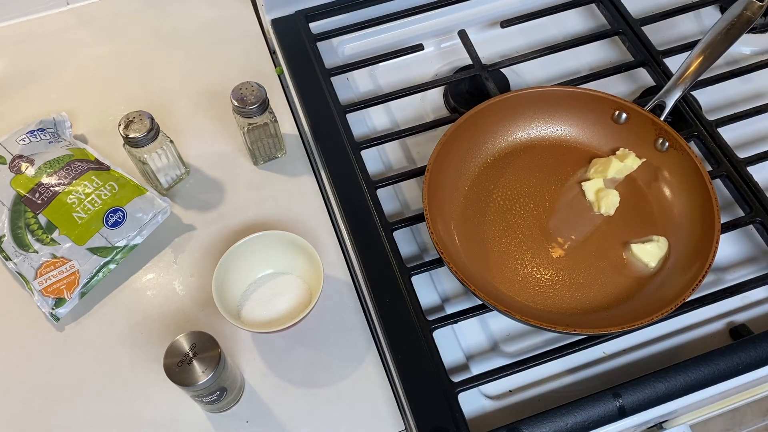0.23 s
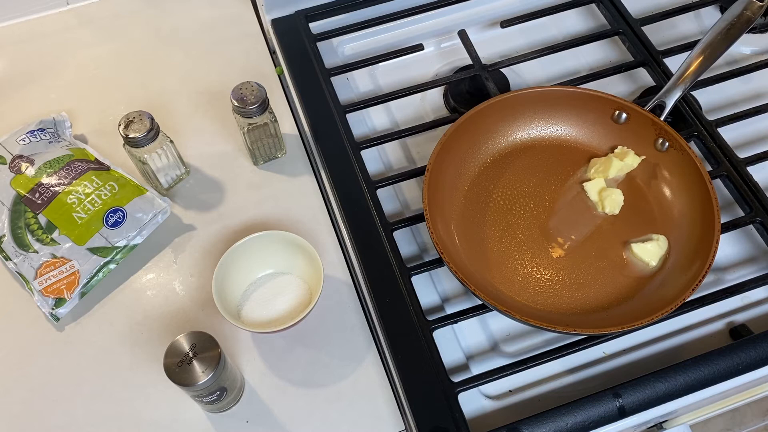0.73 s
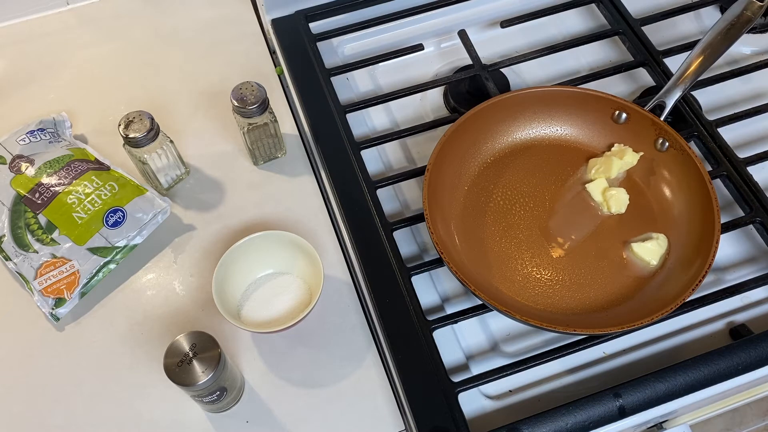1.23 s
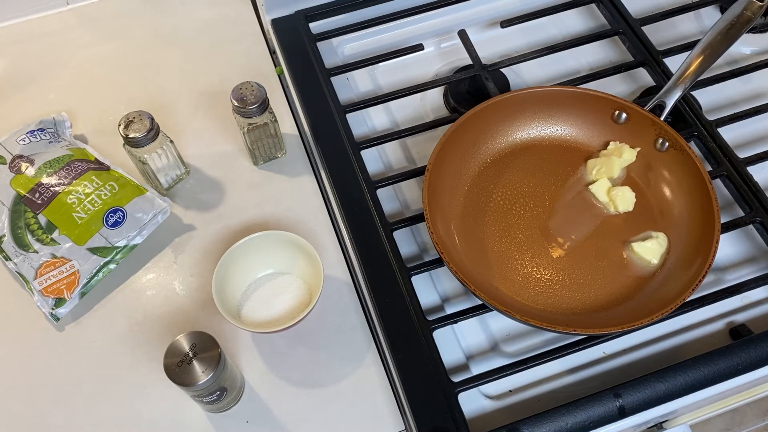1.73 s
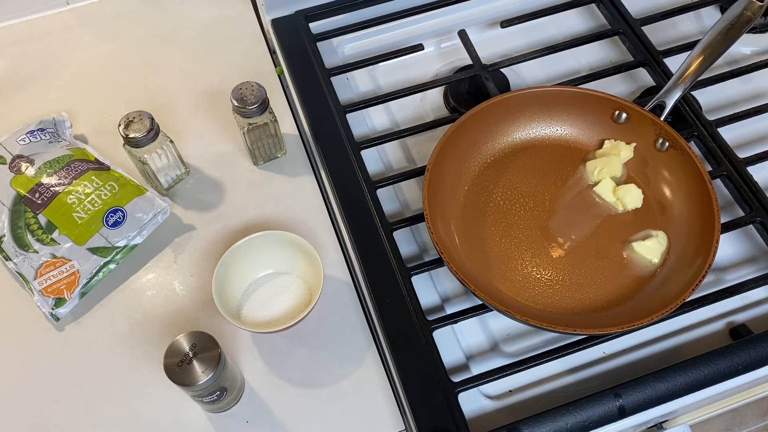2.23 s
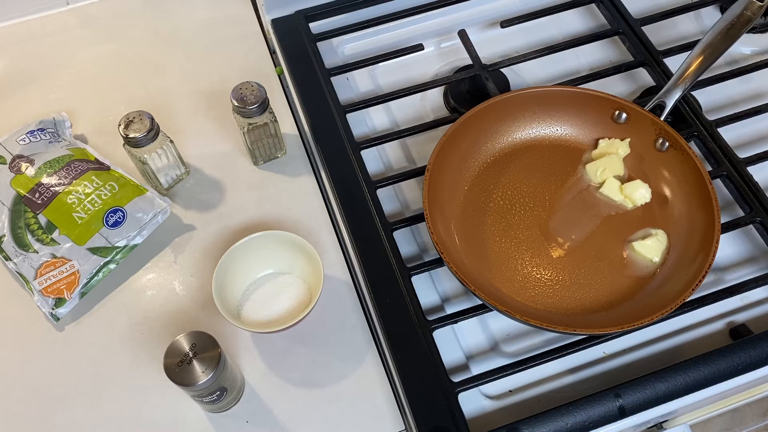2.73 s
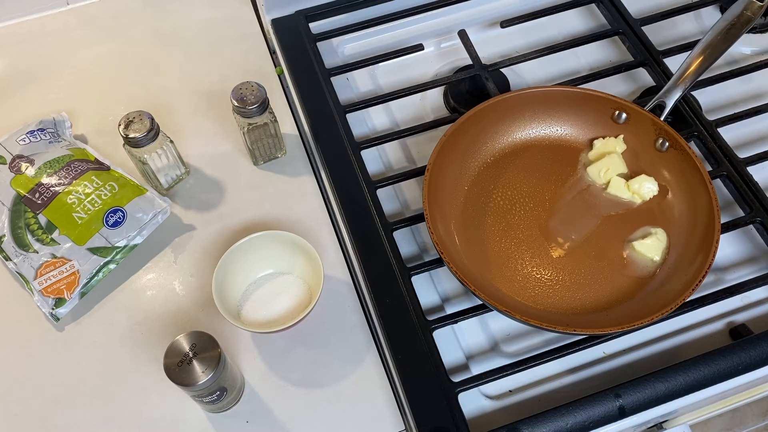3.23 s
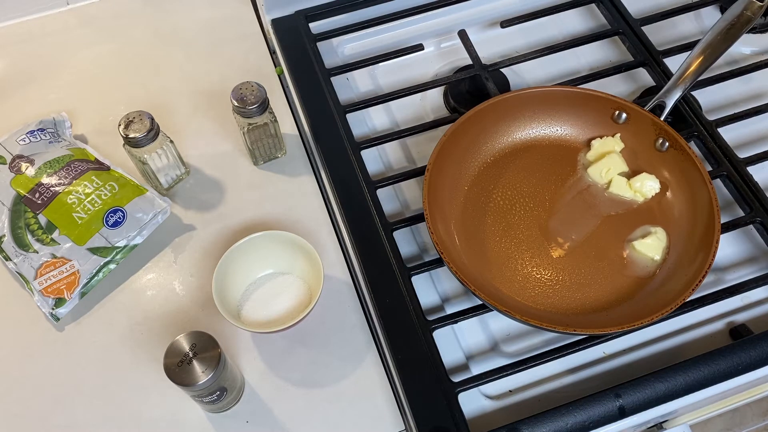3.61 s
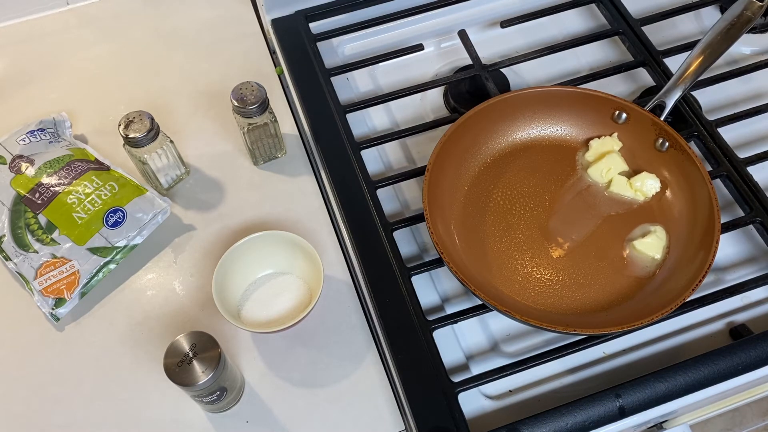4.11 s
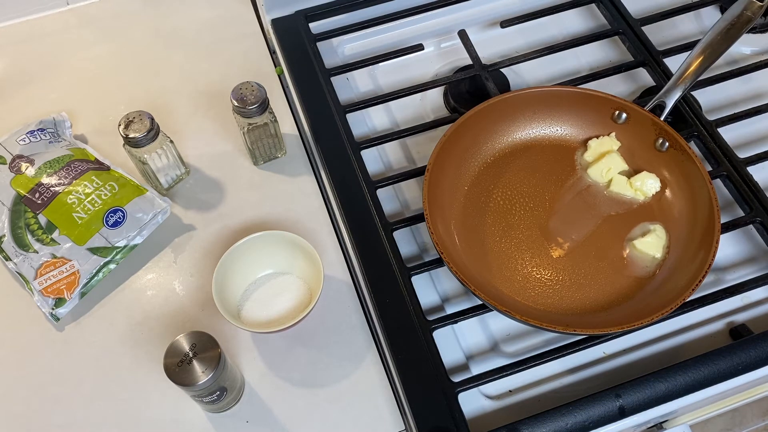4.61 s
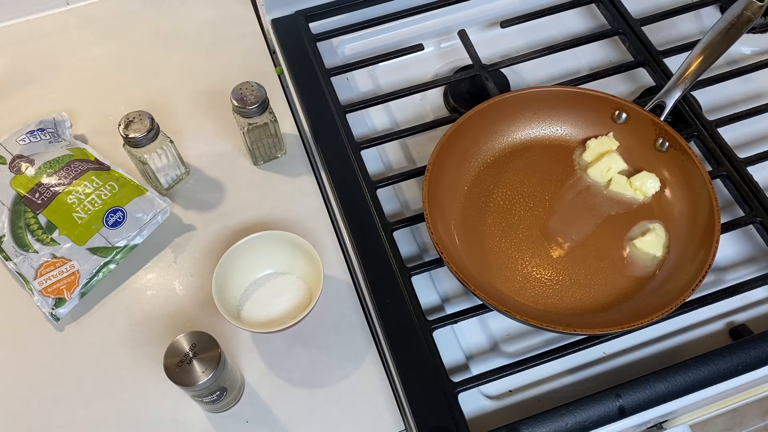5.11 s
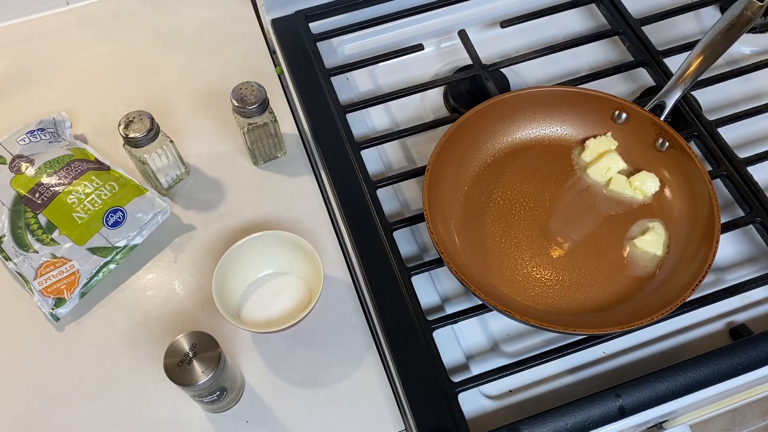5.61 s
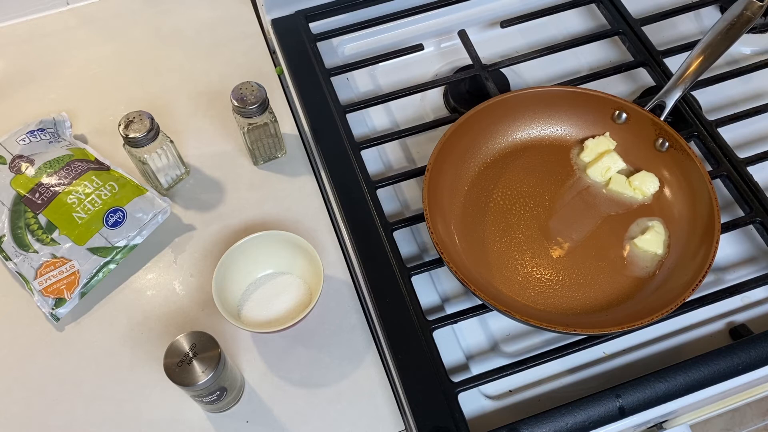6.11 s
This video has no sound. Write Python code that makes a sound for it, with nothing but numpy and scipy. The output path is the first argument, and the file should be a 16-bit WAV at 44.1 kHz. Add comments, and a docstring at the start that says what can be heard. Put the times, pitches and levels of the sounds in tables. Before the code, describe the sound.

Soft clothing rustle and scuffs, a cupboard pulled open with clattering knocks, light handling, one loud wooden slam, then quiet movement over appliance hum.

```python
"""A hard-walled kitchen: a wooden cupboard door, a few steps away, is pulled open, handled and knocked shut.
Each blow is a crack of noise plus decaying door modes, with echoes from the walls; small things tap on the
shelves; pushes and the slam thud, as clusters of modes. Cloth, soles, a sliding thing and the rumbling cabinet
are shaped noise, over air hiss and humming appliances. Two microphone ports, the left a little farther away."""
import sys
import numpy as np
from scipy import signal
from scipy.fft import rfft, irfft, next_fast_len
from scipy.io import wavfile
from scipy.ndimage import uniform_filter1d, minimum_filter1d, map_coordinates

SR = 44100
rng = np.random.default_rng(int(sys.argv[2]) if len(sys.argv) > 2 else 0)


def transcribe(signal):
    """Save signal, clipped to [-1, 1], as a 16-bit WAV file at the path in sys.argv[1]."""
    frames = np.atleast_2d(signal).T
    limited = np.clip(frames, -1, 1)
    pcm = np.round(limited * 32767).astype(np.int16)
    wavfile.write(sys.argv[1], SR, pcm)


N = 280071

# blows on the door: (time [s], crack level [dB], panel level [dB], boom level [dB], brightness [dB per octave])
BLOWS = [(1.049, -39, -31, -27, -4), (1.8891, -26, -36, -21, -1), (1.905, -25.5, -33, -30, -0.5),
         (1.9441, -28, -43, -31, -0.5), (1.9734, -23, -24.5, -25, -0.5), (1.9957, -19.5, -22.5, -26, 5.5),
         (2.0274, -16.5, -28, -23, -2), (2.141, -18.5, -23, -32, -1.5), (2.161, -47, -31, -32, 1),
         (2.3445, -33.5, -56, -35, -1.5), (2.4774, -32.5, -52, -39, -3.5), (2.596, -33.5, -50, -38, -2),
         (2.7001, -35.5, -47, -52, -4.5), (2.925, -54, -40, -39, -13), (3.4533, -31.5, -35, -33, -4),
         (3.607, -41, -31, -40, -5), (3.6219, -27.5, -38, -34, 0), (3.6442, -28.5, -31, -28, 1),
         (3.6984, -36, -35.5, -37, -4), (3.8245, -31, -27.5, -28, 0), (4.0927, -38, -47, -37, -3),
         (4.1365, -33.5, -31.5, -30, -5), (4.2065, -40, -46, -31, 5), (4.348, -19, -28, -13, -2),
         (4.3554, -9, -4.5, -4, -3), (4.365, -9.5, -18, -6.5, -6), (4.3795, -29, -20, -12, 6.5),
         (4.3998, -39, -34, -9, 11.5)]


def amp(db):
    """Amplitude factor of a level in dB."""
    return np.exp(np.asarray(db) * np.log(10) / 20)


def unit(x):
    """x scaled to rms 1."""
    return x / np.sqrt(np.mean(x ** 2) + 1e-20)


def along(points, hz):
    """Value at hz between (frequency, value) points on a log axis."""
    f, v = np.transpose(points)
    return np.interp(np.log(hz + 1), np.log(f + 1), v)


def levels(tables):
    """Per-sample dB curves of the tables' columns; the first column is silent between tables."""
    rows = []
    for table in tables:
        first, last = table[0], table[-1]
        rows += [(first[0] - .03, -100, *first[2:]), *table, (last[0] + .03, -100, *last[2:])]
    s, *columns = np.transpose(rows)
    return [np.interp(np.arange(N) / SR, s, column) for column in columns]


def wobble(rate):
    """A smooth random curve, rate knots a second."""
    knots = rng.standard_normal(int(N * rate / SR) + 4)
    return map_coordinates(knots, [np.arange(N) * rate / SR])


def filtered(x, response):
    """x passed through a complex response of frequency."""
    m = next_fast_len(N + SR // 2)
    hz = np.fft.rfftfreq(m, 1 / SR)
    return irfft(rfft(x, m) * response(hz), m)[..., :N]


def resonances(modes):
    """Response of a body with (frequency [Hz], width [Hz], level [dB]) modes of alternating sign."""
    def response(f):
        return sum((-1) ** k * amp(db) * 1j * f * width / (hz * hz - f * f + 1j * f * width)
                   for k, (hz, width, db) in enumerate(modes))
    return response


def steep(modes):
    """The modes' response applied twice: little is heard away from them."""
    return lambda hz: resonances(modes)(hz) ** 2


def ports(pair):
    """Blends a pair: the ports agree in bass and at the very top, differ between; the left hears later."""
    # left-right likeness: (frequency [Hz], correlation [0-1])
    likeness = [(60, 0.99), (130, 0.97), (290, 0.83), (640, 0.087), (1400, 0.068), (3100, 0.04),
                (7000, 0.77), (15000, 1)]
    left_lag_s = 12 / 44100

    def shares(hz):
        turn = np.arccos(np.clip(along(likeness, hz), -1, 1)) / 2
        return np.array([np.cos(turn), np.sin(turn)])
    mid, side = filtered(pair, shares)
    left_right = np.array([mid + side, mid - side])
    # half the lag delays the left port, half advances the right
    return filtered(left_right, lambda hz: np.exp(np.pi * 1j * left_lag_s * np.outer([-1, 1], hz)))


def noise(response, lumpy_db=0, rate=100, patchy_db=0):
    """Diffuse stereo noise of rms 1, in lumps of random size and patches of random colour."""
    lumpy = amp(lumpy_db * wobble(rate)) * rng.standard_normal((2, N))
    z = signal.stft(lumpy, nperseg=256)[2]
    field = uniform_filter1d(rng.standard_normal(z.shape[1:]), size=5, axis=0)
    field = uniform_filter1d(field, size=12, axis=1)
    pair = signal.istft(z * amp(patchy_db * unit(field)), nperseg=256)[1][:, :N]
    return unit(ports(filtered(pair, response)))


def rubs(start_s, hold_s, level_db):
    """Summed gain of rubs: each rises up to its start, holds, then dies away."""
    rise_db_per_s, fall_db_per_s = 700, 164
    coarse = np.arange(0, N, 32)
    start, hold, level = (np.reshape(v, (-1, 1)) for v in (start_s, hold_s, level_db))
    t = coarse / SR - start
    shape_db = rise_db_per_s * np.minimum(t, 0) - fall_db_per_s * np.maximum(t - hold, 0)
    power = (amp(level + shape_db) ** 2).sum(0)
    return np.interp(np.arange(N), coarse, np.sqrt(power))


def tail(colour):
    """A fresh pair of echo trains of energy 1 before the colour; each frequency dies at its own speed."""
    # how long the kitchen rings: (frequency [Hz], 60 dB decay time [s])
    kitchen_t60 = [(60, 0.27), (200, 0.54), (600, 0.43), (2000, 0.61), (5000, 0.53), (12000, 0.39)]
    size = SR * 3 // 4
    hz, t, z = signal.stft(rng.standard_normal((2, size)), SR, nperseg=256)
    fade = amp(-60 * t / along(kitchen_t60, hz)[:, None])
    norm = np.sqrt(np.mean(fade ** 2, axis=1, keepdims=True) * size)
    echoes = signal.istft(z * fade / norm * colour(hz)[:, None], SR, nperseg=256)[1]
    return echoes * (1 - np.exp(-np.arange(echoes.shape[1]) / SR / 0.0012))  # soft onset


def struck(events, count, spread, cycles):
    """A dull cluster of close modes around each pitch, wider for high ones, building up over some cycles."""
    out, t = np.zeros(N + SR), np.arange(SR // 4) / SR
    for s, db, hz, t60 in events:
        width = spread * (hz / 700) ** .8
        modes = hz * np.exp(rng.normal(0, width, (count, 1)))
        shape = amp(db - 60 * t / t60) * (1 - np.exp(-t * hz / cycles))
        out[round(s * SR):][:len(t)] += shape * np.sin(2 * np.pi * modes * t).sum(0) / np.sqrt(count)
    return out[:N]


def air():
    """Room air: steady hiss and low rumble, slightly uneven in level and colour."""
    # spectrum shape: (frequency [Hz], level [dB per Hz])
    air_colour = [(13, -59), (25, -31), (42, -1.5), (70, -0.5), (165, -8.5), (205, -2.5), (340, -10),
                  (510, -16), (900, -18), (1250, -26.5), (2500, -31.5), (4500, -32.5), (7500, -39.5),
                  (11000, -40.5), (16000, -46)]
    return amp(-41.5) * noise(lambda hz: amp(along(air_colour, hz)), lumpy_db=1.0, rate=6, patchy_db=0.53)


def hum():
    """Appliances: noise through narrow resonances gives wavering bands of hum."""
    # bands: (frequency [Hz], width [Hz], level [dB])
    hum_bands = [(60.3, 3.3, -52), (81.3, 5.7, -48.5), (122.6, 1.04, -50.5), (209.2, 5.8, -52),
                 (242.1, 3.2, -53.5), (295, 38, -54.5), (354.3, 4.4, -57.5), (2074, 40, -63.5),
                 (6250, 120, -63)]
    return sum(amp(db) * noise(resonances([(hz, width, 0)])) for hz, width, db in hum_bands)


def rustle():
    """Cloth rubbing: dense lumpy friction noise, each stroke with more or less fine sheen."""
    # strokes: (start [s], hold [s], level [dB], sheen over it [dB])
    strokes = [(0.0, 0.025, -44.5, -0.5), (0.195, 0.13, -53.5, 1), (0.28, 0.12, -52, 2.5),
               (0.432, .06, -54, 2.5), (0.516, .08, -49.5, 3.5), (0.635, 0.13, -52, 2),
               (0.784, 0.12, -49.5, 5.5), (0.865, 0.13, -46.5, 1.5), (1.038, 0.064, -50.5, -8),
               (1.14, 0.037, -47.5, 2.5), (1.23, .05, -49.5, -2), (1.38, .02, -58.5, 7.5),
               (1.426, 0.073, -55.5, -1), (1.645, .01, -53, -11), (1.741, 0.2, -52.5, -18),
               (2.294, 0.16, -51, -14), (2.549, 0.023, -46, -8), (3.188, .22, -59.5, -2),
               (3.448, 0.01, -48, -18), (3.513, 0.087, -53, -20), (3.638, 0.017, -38, -30),
               (3.723, 0.094, -47, -24), (3.808, 0.033, -43, -20), (3.897, 0.11, -53.5, -10),
               (4.107, 0.028, -50, -24), (4.194, 0.18, -54, -3), (4.666, 0.13, -61.5, 0.5),
               (5.201, 0.06, -50.5, -10), (5.331, .02, -50.5, -15), (5.358, .06, -47, -7.5),
               (5.435, 0.07, -50.5, -8), (5.798, .1, -53, -2.5), (5.91, 0.064, -49, -15),
               (6.04, 0.098, -60, -20)]
    # spectrum shapes of cloth and sheen: (frequency [Hz], level [dB per Hz])
    cloth_colour = [(300, -7), (600, -15.5), (1100, -5), (2000, 1), (3500, -1.5), (5500, -7), (8000, -14.5),
                    (12000, -100)]
    sheen_colour = [(3500, -8.5), (6000, 3.5), (8000, -9.5), (11000, -5.5), (16000, -13)]
    start_s, hold_s, level_db, sheen_db = np.transpose(strokes)
    cloth = noise(lambda hz: amp(along(cloth_colour, hz)), lumpy_db=0.5, rate=140, patchy_db=1.5)
    sheen = noise(lambda hz: amp(along(sheen_colour, hz)), lumpy_db=0.5, rate=240, patchy_db=1.5)
    return rubs(start_s, hold_s, level_db) * cloth + rubs(start_s, hold_s, level_db + sheen_db) * sheen


def soles():
    """Soles scuffing: lumpy friction noise through two steep resonances."""
    # scuffs: (start [s], hold [s], level [dB])
    scuffs = [(0.14, 0.039, -54), (0.29, 0.33, -57.5), (0.9, .03, -60), (1.048, .1, -53.5),
              (1.66, 0.035, -50), (1.82, .03, -53.5), (2.408, 0.054, -50.5), (2.91, 0.025, -62),
              (3.2, 0.27, -56), (3.455, 0.11, -48), (3.64, .03, -48), (3.88, 0.073, -45.5),
              (4.127, 0.044, -52), (4.69, 0.093, -56), (5.402, 0.17, -56), (5.904, 0.043, -45),
              (6.05, .04, -56)]
    # resonances: (frequency [Hz], width [Hz], level [dB])
    scuff_modes = [(748, 360, 5.5), (1343, 220, 2.5)]
    return rubs(*np.transpose(scuffs)) * noise(steep(scuff_modes), lumpy_db=-2.5, rate=97)


def cracks():
    """The crack of each blow, ragged as loose parts rattle, then its echoes from the walls."""
    # spectrum shape of a crack: (frequency [Hz], level [dB per Hz])
    crack_colour = [(150, -28), (400, 2.5), (900, -3), (1400, -2), (2200, 0), (3500, -5), (5500, -7.5),
                    (7800, -24), (11000, -30), (16000, -46)]
    sheen_db = 4.5  # reached at 5.5 kHz
    crack_t60_s = 0.082
    snap_t60_s, snap_db = 0.0099, -0.5  # the first sharp contact, relative to the crack
    out, size = np.zeros((2, N + SR)), SR // 4
    t = np.arange(size) / SR
    decay = amp(-60 * t / crack_t60_s) + amp(snap_db - 60 * t / snap_t60_s)
    shape = decay * (1 - np.exp(-t / 0.00041))
    rattle = amp(1.73 * wobble(260))
    for s, crack_db, _, _, bright_db in BLOWS:
        def colour(hz):
            sheen = sheen_db * np.interp(hz, [4300, 5500], [0, 1])
            tilt = bright_db * np.log2(hz / 2500 + 0.054)
            return amp(crack_db + sheen + along(crack_colour, hz) + tilt)
        start = round(s * SR)
        hz, _, z = signal.stft(rng.standard_normal((2, size)), SR, nperseg=256)
        burst = signal.istft(z * colour(hz)[:, None], SR, nperseg=256)[1][:, :size]
        burst *= shape * amp([[0], [-6]])  # less of what differs between the ports
        echoes = amp(28.0) * tail(colour)
        out[:, start:][:, :size] += burst * rattle[start:][:size]
        out[:, start:][:, :echoes.shape[1]] += echoes
    return ports(out[:, :N])


def ringing():
    """Each blow rings the panels and, slower to build, the low cabinet modes; the pair differs in phase."""
    # modes of door and cabinet: (frequency [Hz], level [dB], 60 dB decay time [s])
    door_modes = [(65.3, -8, 0.37), (74.3, -10.5, 0.37), (89, -11, 0.22), (125, -6, 0.23), (183, -4, 0.18),
                  (232.8, -1.5, 0.13), (285, -9, 0.14), (320, -5.5, 0.12), (388, -8, 0.14),
                  (419.6, -11, 0.14), (465, -13.5, 0.15), (505, -4, 0.098), (546, -19, 0.094),
                  (580.3, -12.5, 0.21), (630, -10, 0.093), (681, -18, 0.13), (742, -12.5, 0.11),
                  (845, -13, 0.21), (905, -22.5, 0.19), (1037, -16, 0.17), (1173, -18.5, 0.15),
                  (1615, -18.5, 0.14), (2020, -24, .1), (2630, -22.5, 0.15)]
    out, t = np.zeros((2, N + SR)), np.arange(SR // 3) / SR
    for s, _, panel_db, boom_db, _ in BLOWS:
        for hz, db, t60 in door_modes:
            # boom drives the modes below 150 Hz, panel those above 300 Hz
            force_db = np.interp(np.log(hz), np.log([150, 300]), [boom_db, panel_db])
            level_db = force_db + db + rng.normal(0, 2.64)
            rise = (1 - np.exp(-t * hz / 1.4)) ** 2
            offset = np.array([[0], [rng.uniform(0, 2 * np.pi)]])
            phase = 2 * np.pi * hz * rng.normal(1, 0.0085) * t + offset
            out[:, round(s * SR):][:, :len(t)] += amp(level_db - 60 * t / t60) * rise * np.sin(phase)
    return out[:, :N]


def kitchen(x):
    """The walls return the ringing as a diffuse tail, least in the bass."""
    # share of the ringing that returns: (frequency [Hz], level [dB])
    returned = [(60, -29), (200, -1.5), (500, -1)]
    wet = signal.fftconvolve(x[None], tail(np.ones_like), axes=1)[:, :N]
    return ports(filtered(wet, lambda hz: amp(along(returned, hz))))


def taps():
    """Small objects set down or nudged: hard contacts, clusters of modes that build in milliseconds."""
    # taps: (time [s], level [dB], pitch [Hz], 60 dB decay time [s])
    tap_events = [(1.089, -41.5, 1098, 0.24), (1.89, -28.5, 3650, .04), (2.026, -21, 2500, 0.041),
                  (2.03, -27.5, 1044, 0.062), (2.143, -24.5, 694, 0.059), (2.479, -38, 1510, .05),
                  (2.597, -33.5, 3530, 0.057), (2.698, -33.5, 870, 0.042), (2.7, -34.5, 1115, .05),
                  (2.925, -37, 860, .045), (2.93, -33, 373, .09), (3.455, -33, 2050, 0.04),
                  (3.645, -28, 2360, .055), (3.645, -33, 1316, 0.055), (3.825, -34, 4100, 0.037),
                  (4.15, -39, 806, 0.072), (4.15, -35, 1274, .07), (4.206, -34.5, 3490, .025),
                  (5.345, -36, 2210, 0.05), (5.914, -39, 1010, .04), (5.93, -35, 1565, 0.11),
                  (6.022, -33, 790, 0.041), (6.045, -38, 790, 0.1)]
    return struck(tap_events, count=14, spread=0.03, cycles=3.1)


def rumble():
    """The swinging door and the hands on it shake the cabinet and its panels."""
    # the door swings open, later shut: (time [s], cabinet level [dB], panels over it [dB])
    swings = [
        [(1.62, -49, -2), (1.84, -39.5, -8), (1.92, -35, -2), (2.004, -29.5, -9), (2.118, -33.5, 0),
         (2.164, -33, -14), (2.36, -40, 0), (2.55, -43, -6.5), (2.8, -48, -15)],
        [(3.2, -58, 5), (3.394, -34, -12.5), (3.476, -50, -9), (3.578, -31, -2.5), (3.62, -40, 1.5),
         (3.81, -33, -12), (3.85, -42, 0), (3.918, -27, -8.5), (3.96, -31, -12), (4.1, -40, -5.5),
         (4.33, -41.5, -11)],
    ]
    # resonances of cabinet and panels: (frequency [Hz], width [Hz], level [dB])
    cabinet_modes = [(68, 35.5, 0), (151.3, 66, -1.5)]
    panel_modes = [(214, 117, -1.5), (381, 135, 1.5), (600, 334, -3.5)]
    level_db, panel_db = levels(swings)
    cabinet = noise(steep(cabinet_modes))
    panels = noise(steep(panel_modes), lumpy_db=2.0, rate=37)
    return amp(level_db) * (cabinet + amp(panel_db) * panels)


def thuds():
    """Pushes and the slam flex the cabinet: pairs of low modes that swell over about one cycle."""
    # thuds: (time [s], level [dB], pitch [Hz], 60 dB decay time [s])
    thud_events = [(1.905, -23.5, 134, 0.19), (1.975, -10.5, 132, 0.12), (2.0, -9, 142, 0.11),
                   (2.035, -15.5, 77.8, 0.23), (2.15, -28, 70, 0.092), (2.34, -24, 109, 0.089),
                   (3.57, -28, 186, 0.16), (3.8, -20, 149, 0.081), (3.865, -19.5, 150, 0.065),
                   (3.9, -14, 153.5, 0.1), (3.97, -34, 150, .08), (4.15, -24, 134.5, 0.18),
                   (4.36, -18, 78.7, 0.35), (4.368, -7, 98, 0.11), (4.632, -29, 121, 0.38)]
    return struck(thud_events, count=2, spread=0.097, cycles=0.98)


def scrape():
    """Something slides on a shelf: friction hiss crossfades from a high towards a low resonance."""
    # the slide: (start [s], hold [s], level [dB])
    slide = (5.98, 0.14, -52)
    start_hz, sag_hz_per_s = 3940, 3000  # centre of the hiss, sinking
    centre_hz = start_hz - sag_hz_per_s * (np.arange(N) / SR - slide[0])
    low_hz, high_hz = 3100, 4600
    share = np.clip((centre_hz - low_hz) / (high_hz - low_hz), 0, 1)
    low, high = (noise(steep([(hz, 1400, 0)]), lumpy_db=-2.0, rate=130) for hz in (low_hz, high_hz))
    return rubs(*slide) * (np.sqrt(1 - share) * low + np.sqrt(share) * high)


def scene():
    """The cupboard, direct and from the walls, with the person and the room around it."""
    rings, small = ringing(), taps() + thuds()
    struck_pair = rings * amp([[0], [-3]]) + [small, 0 * small]
    direct = ports(struck_pair) * amp([[-1], [1.2]])  # left, right [dB]
    walls = amp(-2.0) * kitchen(rings[0] + small)
    blows = cracks() * amp([[-.4], [.4]])
    return direct + walls + blows + rustle() + soles() + scrape() + rumble() + air() + hum()


def record(dry):
    """The recorder drops the deepest bass, a fast limiter holds the peaks, nothing is kept above 15.8 kHz."""
    sound = filtered(dry, lambda hz: (1j * hz / (1j * hz + 22)) ** 2)
    need = np.minimum(1, .9 / (np.abs(sound).max(0) + 1e-9))
    gain = uniform_filter1d(minimum_filter1d(need, size=441), size=441)  # 10 ms windows
    return filtered(sound * gain, lambda hz: hz < 15800)


dry = scene()
out = record(dry)
transcribe(out)
```